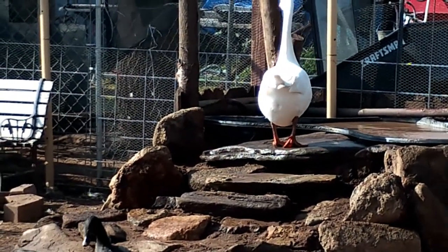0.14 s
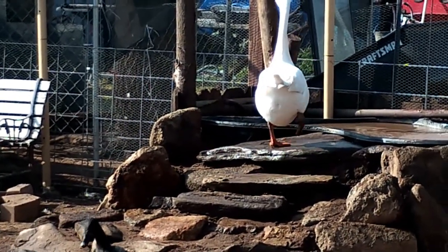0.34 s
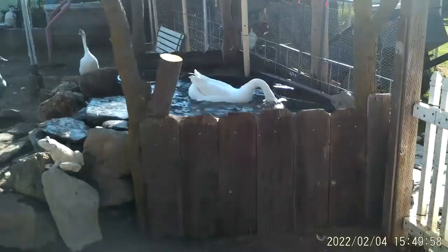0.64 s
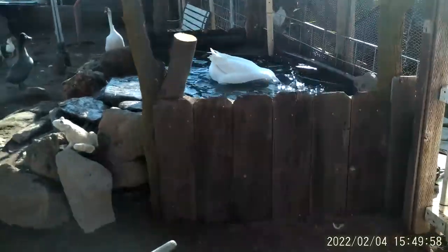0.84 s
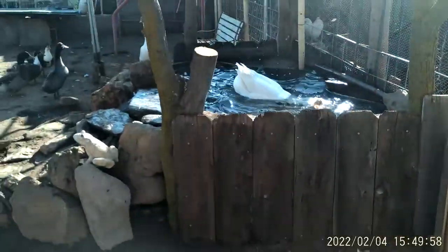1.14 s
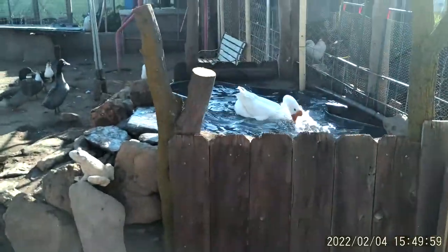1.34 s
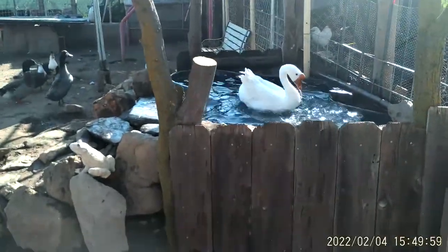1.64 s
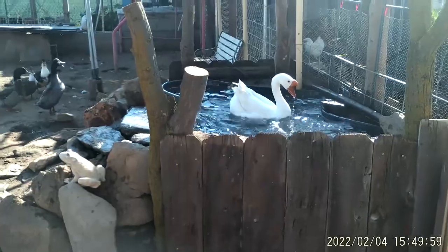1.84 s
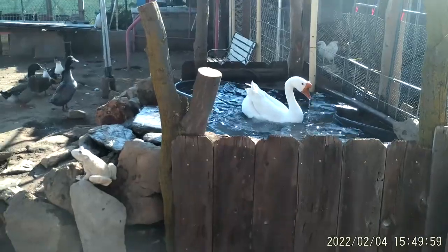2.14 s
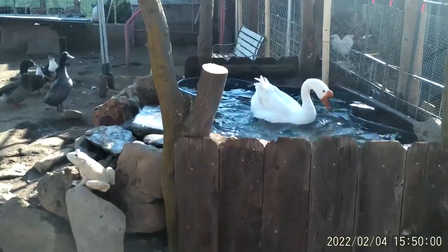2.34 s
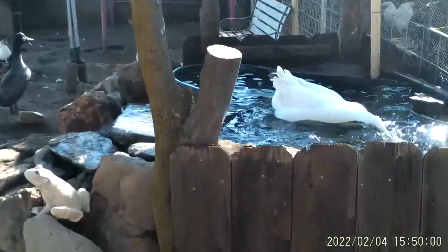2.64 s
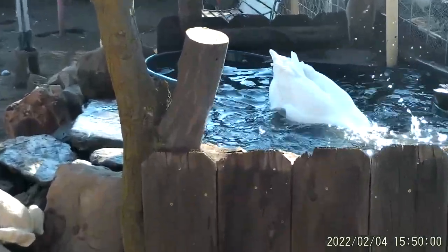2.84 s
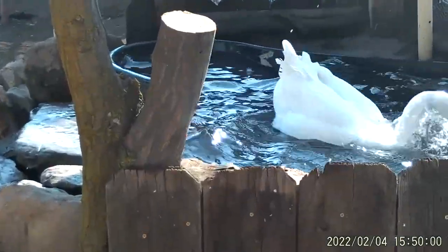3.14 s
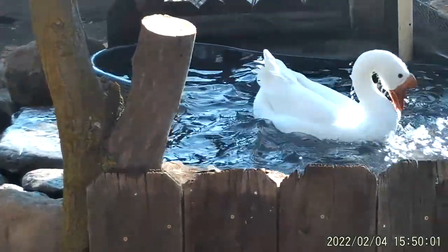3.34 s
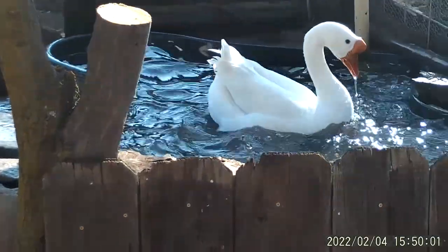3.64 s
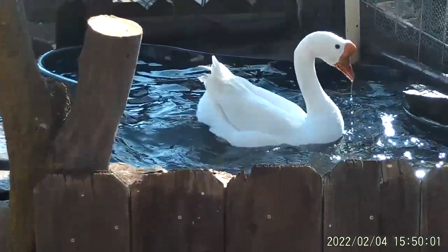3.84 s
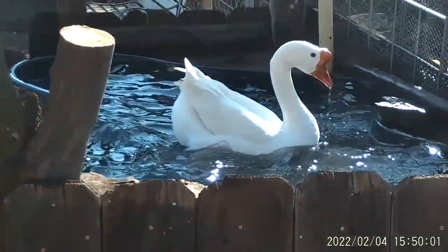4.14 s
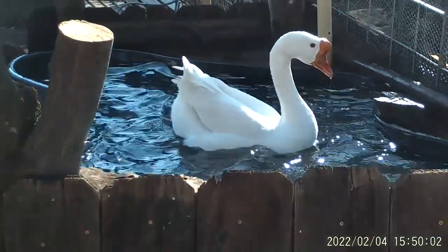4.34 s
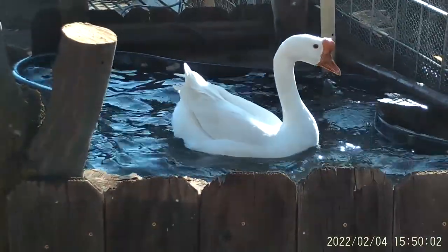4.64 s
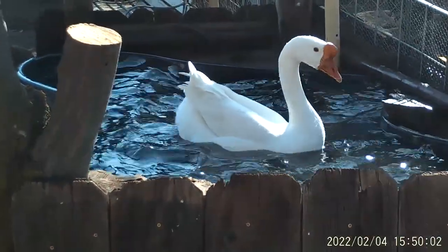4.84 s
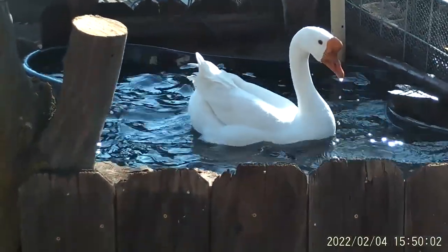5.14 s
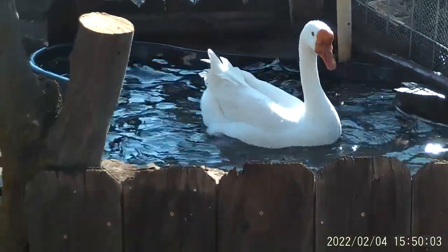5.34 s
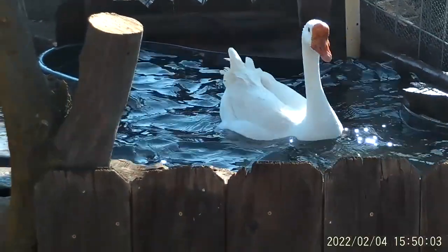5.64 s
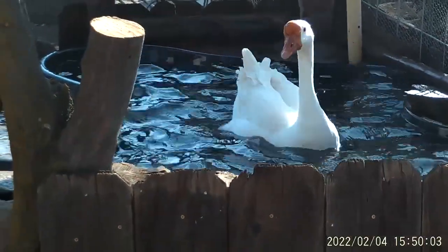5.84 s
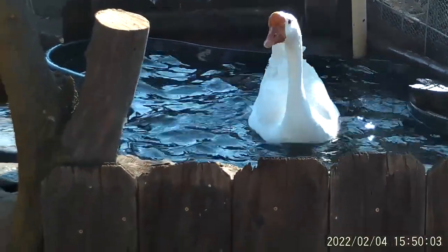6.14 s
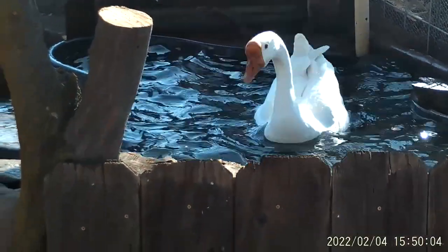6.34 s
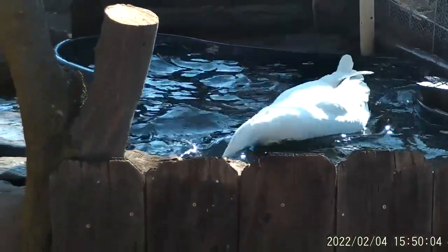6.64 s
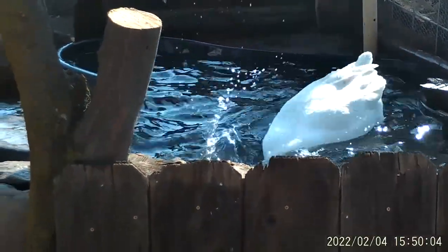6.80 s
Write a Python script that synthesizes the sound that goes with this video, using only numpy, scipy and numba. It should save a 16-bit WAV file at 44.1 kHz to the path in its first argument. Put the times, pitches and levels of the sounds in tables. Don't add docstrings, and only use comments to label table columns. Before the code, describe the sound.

Harsh goose honks echo lightly around a yard, with bathing splashes, plank knocks and two clear bird yelps over a faint pump hum.

```python
import sys
import numpy as np
from scipy import signal
from scipy.io import wavfile
from scipy.ndimage import uniform_filter1d
from numba import njit

SR = 44100
rng = np.random.default_rng(int(sys.argv[2]) if len(sys.argv) > 2 else 0)


def materialize(psi):
    bounded = np.clip(np.atleast_2d(psi).T, -1, 1)
    quanta = np.round(bounded * 32767).astype(np.int16)
    wavfile.write(sys.argv[1], SR, quanta)


def how_loud(loudness_db):
    steps = np.asarray(loudness_db, float) / 20
    return 10 ** steps


N = 307377


def rms_one(x):
    return x / np.sqrt(np.mean(x ** 2) + 1e-20)


def in_time(rows):
    s, *columns = np.transpose(rows)
    return [np.interp(np.arange(N) / SR, s, c) for c in columns]


def drift(rate):
    knots = rng.standard_normal(int(N / SR * 400) + 2)
    return np.interp(np.arange(N) / SR * rate, np.arange(len(knots)), knots) * 1.22


def band(x, low_hz, high_hz, order=2):
    sos = signal.butter(order, [low_hz, min(high_hz, .45 * SR)], "band", fs=SR, output="sos")
    return signal.sosfilt(sos, x)


@njit
def resonate(x, hz, r, step):
    y = np.zeros(len(x))
    for i in range(2, len(x)):
        drive = (1 - r * r) / 2 * (x[i] - x[i - 2])
        y[i] = drive + 2 * r * np.cos(step * hz[i]) * y[i - 1] - r * r * y[i - 2]
    return y


def mode(x, hz, width_hz):
    return resonate(x, hz + np.zeros(len(x)), np.exp(-np.pi * width_hz / SR), 2 * np.pi / SR)


def even(x):
    power = uniform_filter1d(uniform_filter1d(x ** 2, size=2000), size=2000)
    return x / np.sqrt(power + 1e-12)


def held(start, length, rise_db_s, fall_db_s):
    t = np.arange(0, N / SR, .001)[:, None]
    return -rise_db_s * np.maximum(start - t, 0) - fall_db_s * np.maximum(t - start - length, 0)


def summed(db, calm_db):
    total = 10 * np.log10(np.sum(how_loud(2 * db), axis=1) + how_loud(2 * calm_db))
    return np.interp(np.arange(N) / SR * 1000, np.arange(len(total)), total)


# [f/Hz, level/dB per Hz]
MURMUR_COLOUR = [(18, -39), (30, -9), (87, -11), (175, -10.5), (294, -4), (1130, 2), (1320, 2.5),
                 (1580, -1.5), (2160, -10.5), (2800, -13.5), (3190, -11.5), (5640, -17.5), (6940, -26.5),
                 (9470, -27.5), (14700, -31)]
# [t/s, level/dB]
MURMUR_LEVEL = [(0.0, -59.5), (0.55, -60), (0.83, -55.5), (1.18, -60), (2.02, -57), (2.91, -62),
                (3.22, -55), (4.06, -64), (5.18, -60.5), (5.63, -62), (6.97, -60)]
# [f/Hz, width/Hz, level/dB]
PUMP = [
    (233.2, 20.3, -5.5),
    (450.4, 42, -1.5),
]


def yard(patchy_db=3.0):
    white, out = rng.standard_normal((2, N)), 0
    edges_hz = 100 * 2 ** np.arange(0, 7.4, 1 / 3)
    colour_hz, colour_db = np.transpose(MURMUR_COLOUR)
    murmur_db, = in_time(MURMUR_LEVEL)
    pump_db, pump_starts_s, pump_rise_db_s = -66, 0.69, 56
    hum_db = pump_db - pump_rise_db_s * np.maximum(pump_starts_s - np.arange(N) / SR, 0)
    for k, (low, high) in enumerate(zip(edges_hz, edges_hz[1:])):
        level_db = np.interp(np.log(low * high) / 2, np.log(colour_hz), colour_db)
        flicker_db = patchy_db * np.clip(2000 / low, .3, 1) * drift(9)
        out = out + how_loud(level_db + flicker_db) * band(white[k % 2], low, high)
    out = out / np.std(band(out, 520, 1000)) * how_loud(murmur_db)
    hum = sum(how_loud(hum_db + db) * even(mode(mode(white[0], hz, w), hz, w)) for hz, w, db in PUMP)
    hiss = how_loud(-74.5) * rms_one(band(white[1], 8100, 14200))
    return out + hum + hiss


# [t/s, length/s, level/dB]
SPRAYS = [
    (0.0, 0.52, -64),
    (0.613, 0.071, -61),
    (1.317, 0.36, -56),
    (1.867, 0.22, -61),
    (2.626, 0.27, -63),
    (3.134, 0.2, -56.5),
    (5.422, 0.1, -65),
    (6.714, 0.057, -55),
    (6.85, 0.11, -64.5),
]
# [t/s, length/s, level/dB]
GUSTS = [(0.0, 0.1, -67), (0.601, 0.536, -71), (1.33, 0.038, -74), (1.465, 0.016, -56), (1.822, 0.088, -60),
         (2.56, 0.028, -65), (2.829, 0.056, -65), (2.976, 0.0414, -70), (3.33, 0.029, -70.5),
         (3.467, 0.024, -59), (4.44, 0.051, -69), (5.201, 0.14, -75), (5.42, 0.083, -65.5),
         (5.555, 0.15, -75)]


def water_and_wind():
    s, length, db = np.transpose(SPRAYS)
    spray_db = summed(db + held(s, length, rise_db_s=253, fall_db_s=126), calm_db=-70.5)
    s, length, db = np.transpose(GUSTS)
    wind_db = summed(db + held(s, length, rise_db_s=304, fall_db_s=198), calm_db=-78.5)
    drops = rng.random(N) < 1500 * how_loud(5 * drift(25)) / SR
    drop_size = how_loud(2.5 * np.minimum(rng.exponential(1, N), 7))
    grains = drops * drop_size * rng.choice([-1, 1], N)
    spray = rms_one(band(grains, 2230, 8700)) * how_loud(spray_db - 6.5)
    rumble = band(rng.standard_normal(N), 25, 153.0) * how_loud(2.4 * drift(34))
    return spray + rms_one(rumble) * how_loud(wind_db + 1.0)


# [t/s, peak level/dB, f/Hz]
DRIPS = [(0.655, -45, 3720), (0.668, -51, 2280), (1.3865, -49, 3480), (1.404, -46, 3900),
         (1.769, -47, 2000), (2.5533, -48, 5494), (2.9963, -51, 4067), (3.2629, -45.5, 3500),
         (3.349, -49, 5860), (1.285, -52, 5870), (1.321, -44.5, 3900), (1.3595, -41.5, 2303),
         (1.3795, -46, 2460), (1.421, -46, 3640), (1.4441, -60, 2370), (1.5175, -41, 5445),
         (1.5617, -46, 5454), (1.6265, -44, 5520), (1.6584, -46.5, 3970), (1.779, -62, 2468),
         (2.452, -47.5, 3900), (2.5152, -38.5, 4100), (2.6658, -46.5, 2970), (2.8691, -43.5, 2360),
         (2.97, -42.5, 5850), (3.1589, -44, 2438), (3.2529, -51, 5600), (3.319, -42.5, 7350),
         (3.38, -41.5, 3850), (3.8542, -52, 5659), (6.7095, -42, 3748), (6.7392, -54, 5415),
         (6.867, -50, 3890)]
# [t/s, peak level/dB, f/Hz]
GURGLES = [(0.64, -52, 965), (0.714, -44.5, 893), (1.241, -47.5, 740), (1.349, -43, 957), (1.383, -41, 712),
           (3.26, -37, 1082), (3.329, -59, 1115), (3.389, -43, 672), (6.72, -39.5, 875), (6.744, -41, 1115),
           (6.768, -49.5, 493.6)]


def drips():
    out, t = np.zeros(N + 4410), np.arange(4410) / SR
    for s, db, hz in DRIPS:
        burst = rng.standard_normal(len(t)) * how_loud(-60 * t / 0.05) * (1 - np.exp(-t / 0.00018))
        hiss = 0.83 * band(burst, 1010, 10500, order=4) + 5.6 * mode(burst, hz, 415)
        at = round(s * SR)
        out[at:at + len(t)] += how_loud(db - 6.5) * hiss
    for s, db, hz in GURGLES:
        rising = np.sin(2 * np.pi * hz * t * (1 + 3.4 * t))
        pocket = rising * how_loud(-60 * t / 0.076) * (1 - np.exp(-t / 0.0032))
        wobble = 1 + 1.2 * band(rng.standard_normal(len(t)), 30, 400) * 7
        at = round(s * SR)
        out[at:at + len(t)] += how_loud(db) * pocket * wobble
    return out[:N]


# [t/s, peak level/dB, f/Hz, crack level/dB, thump level/dB]
KNOCKS = [(1.101, -54, 288.3, -66, -71.5), (1.434, -37, 320, -59, -63), (1.473, -46, 325, -64, -39),
          (1.788, -46, 305, -69, -64.5), (1.834, -37, 301, -73, -67.5), (1.881, -33, 356, -57, -57),
          (2.31, -32, 376, -37.5, -68), (2.531, -30, 376, -35, -63), (2.781, -50, 320.3, -50, -63),
          (2.996, -38, 380, -40, -62), (3.454, -35, 341, -23.5, -71)]


def knocks():
    out, t = np.zeros(N + 8820), np.arange(8820) / SR
    cycles_to_die = 41
    for s, db, hz, crack_db, thump_db in KNOCKS:
        body = np.sin(2 * np.pi * hz * t) * how_loud(-60 * t * hz / cycles_to_die)
        body = body + how_loud(-10.0) * np.sin(2 * np.pi * 1.9 * hz * t) * how_loud(-60 * t / 0.059)
        snap = rng.standard_normal(len(t)) * how_loud(-60 * t / 0.014) * (1 - np.exp(-t / 0.0006))
        crack = band(snap, 570, 6500, order=6)
        crack = 0.77 * crack + 0.72 * mode(crack, 3550, 710) - 1.4 * mode(crack, 6300, 900)
        thump = np.sin(2 * np.pi * 70 * t) * how_loud(-60 * t / 0.065)
        knock = how_loud(db) * body * (1 - np.exp(-t / 0.0011))
        at = round(s * SR)
        out[at:at + len(t)] += knock + how_loud(crack_db + 11.5) * crack + how_loud(thump_db) * thump
    return out[:N]


# [t/s, f/Hz, level/dB]
SPARROW = [
    (.103, 5280, -84),
    (.11, 5600, -54),
    (.122, 5400, -52),
    (.147, 4330, -59),
    (.157, 3900, -79),
    (.174, 5300, -54),
    (.183, 5850, -47),
    (.2, 5600, -95),
]


def sparrow():
    hz, db = in_time(SPARROW)
    t = np.arange(N) / SR
    tremble_db = 4 * drift(300) + 6.0 * np.cos(2 * np.pi * 90.0 * t)
    return how_loud(db - 9 + tremble_db) * (t < .2) * np.sin(2 * np.pi * np.cumsum(hz) / SR)


# [f/Hz, level/dB]
YELP_THROAT = [(800, 4.5), (1450, 5), (1600, 10), (1730, 6), (1900, -3), (2400, -9), (3800, -14),
               (6500, -33), (11000, -42)]


def yelp(rows, throb_db=0, strain=1, fourth_db=0, top_db=0):
    s, hz, db, first_db, open_db = np.transpose(rows)
    span = np.arange(round(s[0] * SR), round(s[-1] * SR))
    t = span / SR
    shake = band(rng.standard_normal((8, len(t))), 90, 380) * 8
    gate = np.clip(np.minimum(t - s[0], s[-1] - t) / .004, 0, 1)
    glide = uniform_filter1d(np.interp(t, s, hz), size=400, mode="nearest")
    phase = 2 * np.pi * np.cumsum(glide * (1 + .007 * strain * shake[7])) / SR
    throb_hz, throb_top_s = 55, 3.111
    throb = np.clip((t - throb_top_s) / 0.0067 + 1, 0, 1) * np.cos(2 * np.pi * throb_hz * (t - throb_top_s))
    level_db = np.interp(t, s, db) + throb_db * throb
    throat_hz, throat_db = np.transpose(YELP_THROAT)
    out = np.zeros(N)
    for k in range(13):
        hoarse = 1 + (.24 + .1 * min(k, 6) * strain ** 2) * shake[k % 7]
        colour_db = np.interp(np.log((k + 1) * glide), np.log(throat_hz), throat_db)
        bill_db = np.interp(t, s, [first_db, 0 * s, open_db][min(k, 2)])
        extra_db = (k == 3) * fourth_db + max(k - 3, 0) * top_db
        loud = np.sqrt(2) * gate * how_loud(level_db + colour_db + bill_db + extra_db)
        out[span] += loud * hoarse * np.sin((k + 1) * phase)
    return band(out, 480, 12000, order=3)


# [t/s, f/Hz, level/dB, first partial/dB, bill opening/dB] a
GURGLE_LOW = [
    (1.272, 775, -64, 11, -13),
    (1.285, 728, -69, 8.4, -10),
    (1.298, 638, -52, 8.8, -13),
    (1.312, 625, -79, 7.1, -10),
]
YELP_SHORT = [
    (3.08, 747, -74, 5, -16),
    (3.089, 785, -42, -7, -26),
    (3.101, 773, -51, -4, -26),
    (3.111, 815, -34, -10, -22),
    (3.12, 770, -36.5, -5, 5),
    (3.13, 765.5, -39.5, 3, 4.5),
    (3.147, 743, -36, -6, -2),
    (3.157, 677, -42, 10.5, -22),
    (3.166, 640, -59, 5, -8),
]
YELP_TAIL = [
    (3.162, 635, -61, -2, -6),
    (3.175, 607, -54.5, -5, -8),
    (3.19, 671, -57, 4, -18),
    (3.21, 693, -64, 0, -10),
    (3.24, 685, -60, 2, -12),
]
YELP_RISE = [
    (4.895, 693, -60.5, -1, 1),
    (4.915, 670, -56.5, 3.5, -15),
    (4.935, 731, -42.5, -0.5, -15),
    (4.95, 779.5, -50.5, -3, -1),
    (4.965, 824.5, -47, -4, 6.5),
    (4.98, 849.5, -39.5, 3.5, -10),
    (4.993, 933.5, -43, -4, -15),
]
YELP_BREAK = [
    (4.99, 1035, -40, 0, 4),
    (5.003, 1030, -32, -6, -7),
    (5.015, 1058, -38, 2.5, -3),
    (5.032, 1065, -49, 0, -5.5),
]
YELP_SPLIT = [
    (5.005, 659.5, -55, -22, -12),
    (5.02, 666, -41, -23, 0),
    (5.03, 660, -41, -24, -13),
    (5.039, 680, -45, -18, -10),
]
YELP_HOLD = [
    (5.016, 874, -39, -1, 5),
    (5.027, 849, -35, -4.5, -4),
    (5.045, 856, -40, -6.5, 5),
    (5.065, 861, -35.5, -7, -2),
    (5.08, 843, -39.5, -7, 5.5),
    (5.09, 837, -54, 6.5, 15),
    (5.105, 829, -65, 2, 5.5),
]


def yelps():
    second = yelp(YELP_RISE, top_db=-1.0) + yelp(YELP_BREAK) + yelp(YELP_SPLIT) + yelp(YELP_HOLD)
    first = yelp(YELP_SHORT, throb_db=4.0, strain=0.55, fourth_db=-8, top_db=-1.5)
    return yelp(GURGLE_LOW) + first + yelp(YELP_TAIL, strain=3.6) + second


# [t/s, peak level/dB, f/Hz]
SLAPS = [(0.6452, -48, 1350), (0.6677, -34, 1410), (0.76, -25.5, 1344), (0.765, -25, 1274),
         (0.8439, -31.5, 1349), (0.9241, -40, 2050), (0.9727, -41, 1310), (0.991, -36, 1360),
         (1.0149, -33, 1394), (1.0284, -27.5, 2060), (1.0792, -35, 1429), (1.124, -38, 1950),
         (1.146, -41, 1370), (1.1815, -42, 1883), (1.204, -40, 1260), (1.2144, -41, 1246),
         (1.3017, -39, 1355), (1.404, -34, 1220), (1.414, -35, 1274), (1.474, -35, 1345),
         (1.621, -41, 1270), (1.6564, -36.5, 1260), (1.6916, -38, 1276), (1.7477, -49, 1383),
         (1.783, -41, 1403), (1.8475, -37, 1406), (1.9135, -43, 1104), (1.914, -34, 1360),
         (2.0081, -38, 1290), (2.0178, -39, 1240), (2.044, -30, 1490), (2.2052, -41, 1530),
         (2.5887, -39, 1355),
    (2.664, -40, 1430),
    (2.7146, -36, 1500),
    (2.7768, -32, 1246),
    (2.8052, -29, 1280),
    (2.8468, -26.5, 1430),
    (2.8731, -34, 1390),
    (2.9006, -30, 1486),
    (2.9463, -29.5, 1426),
         (3.4855, -31, 1498), (3.5208, -34, 1410), (3.5317, -34, 1400), (3.5545, -29.5, 1430),
                (3.6065, -35, 1414), (3.636, -30.5, 1540), (3.7164, -31.5, 1400), (4.074, -44, 1420),
                (4.1099, -39, 1468), (4.1415, -40, 1324), (4.1726, -34, 1293), (4.186, -28, 1410),
                (4.223, -29.5, 1434), (4.3003, -29, 1550), (4.3309, -27.5, 1550), (4.433, -34, 1430),
         (5.4166, -33, 1290), (5.4631, -36.5, 1452), (5.4931, -33.5, 1235), (5.5333, -38, 1519),
              (5.5463, -34, 1456), (5.5606, -29, 1453), (5.6008, -30, 1467), (5.6375, -30, 1435),
              (5.6906, -34.5, 1350), (5.7178, -30, 1380), (5.7749, -32.5, 1580), (5.8073, -31, 1345),
              (5.8787, -33, 2103), (6.4469, -39, 1360), (6.461, -32.5, 1320), (6.472, -34.5, 1380),
              (6.5656, -36, 1600), (6.5962, -36, 1339), (6.6275, -32, 1580), (6.684, -31.5, 1330),
              (6.9226, -41, 1483), (6.9399, -37, 1273)]


def hard_slaps():
    out, t = np.zeros(N + 1323), np.arange(1323) / SR
    rise_s, trim_db = .0022, -5.5
    shape = t / rise_s * np.exp(1 - t / rise_s)
    for s, db, hz in SLAPS:
        top = how_loud(-18) * band(rng.standard_normal(len(t)), 1380, 5760)
        at = round(s * SR)
        out[at:at + len(t)] += how_loud(db + trim_db) * shape * (np.sin(2 * np.pi * hz * t) + top)
    return out[:N]


# [t/s, length/s, f/Hz, level/dB]
SINGS = [(0.753, 0.051, 3840, -62), (3.7, 0.027, 5060, -71), (4.257, 0.12, 3530, -58.5),
         (4.323, 0.088, 5360, -63), (4.4, 0.048, 3776, -55), (5.803, 0.089, 2685, -51),
         (5.894, 0.032, 3860, -48), (1.63, 0.027, 3880, -60), (1.92, 0.039, 3720, -59),
         (5.03, .04, 5160, -54), (5.084, 0.06, 3900, -60), (5.03, .06, 4280, -55), (5.43, .14, 2050, -57),
         (6.67, .06, 3800, -58), (6.48, .2, 2900, -62), (6.5, .14, 3500, -64), (3.54, .17, 3500, -61),
         (3.56, .17, 2950, -60), (2.72, .2, 2550, -62), (4.4, .1, 2950, -60), (3.79, .25, 1300, -62),
         (5.11, 0.027, 5200, -62), (5.914, 0.022, 4794, -56.5), (3.148, 0.017, 3410, -56),
         (3.16, 0.013, 2420, -55)]


def sung(airy):
    out, width_hz, fade_db_s = 0, 100, 800
    for s, length, hz, db in SINGS:
        level_db = summed(db + held(np.array([s]), np.array([length]), fade_db_s, fade_db_s), -120)
        out = out + how_loud(level_db) * even(mode(mode(airy, hz, width_hz), hz, 2 * width_hz))
    return out


# [t/s, length/s, level/dB, swell/s, bill opening/dB]
HONKS = [(.93, 0.068, -48, 0.12, 2), (1.7, 0.3, -51, 0.049, -2), (2.658, 0.3, -41.5, 0.23, -13),
         (3.27, 0.18, -53, 0.13, -8), (3.425, 0.3, -44, 0.073, 0), (4.112, 0.31, -39, 0.091, -5.5),
         (4.433, 0.098, -47.5, 0.02, -6), (4.871, 0.28, -42, 0.14, -3), (5.419, .25, -40.5, 0.14, -9),
         (5.675, .275, -44, 0.034, -2.5), (6.081, 0.12, -64, 0.021, 0.5), (6.201, 0.28, -57, 0.061, 0.5),
         (6.439, 0.27, -44.5, 0.022, -1.5), (6.895, 0.31, -45.5, 0.1, -7)]
# [t/s, length/s, level/dB, second resonance/dB, windpipe/dB]
CACKLES = [(.03, 0.15, -62.5, -14, -6), (.3, 0.1, -58, -12, -9), (0.494, 0.078, -56, -11, -10),
           (.64, 0.05, -48, -2, -9), (.756, 0.044, -35.5, -51, -22), (.82, 0.053, -45, -9, -17),
           (1.001, 0.082, -41, -1.5, -10), (1.111, 0.071, -51, 1, -4), (1.205, 0.049, -47, -9, -15),
           (1.302, 0.028, -44, -20, -16.5), (1.41, 0.045, -47, -6.5, -13), (1.625, 0.031, -52, -1, -3),
           (1.655, 0.033, -46, -2.5, -11), (2.019, 0.055, -44, -9, -16), (2.2, 0.039, -53, -10, -14),
           (2.43, 0.068, -51, -10.5, -11), (2.576, 0.0383, -54, -14, -20), (2.63, 0.24, -56, 4, -5),
           (4.073, 0.037, -53.5, -33, -15), (4.567, 0.053, -53, -10, -8), (4.99, 0.036, -48.5, -2, 3),
           (1.47, 0.034, -49, -10, -15), (1.78, 0.036, -53, -3, -8), (1.9, 0.032, -51, 0.5, -5.5)]


def calls():
    s, length, db, swell, bill_db = np.transpose(HONKS)
    swell_db, sag_db_s, onset_db_s = 7.5, 18, 897.5
    bill_lags_s, bill_opens_s, bill_shut_db = .025, .04, 16
    age = np.clip(np.arange(0, N / SR, .001)[:, None] - s, 0, length)
    to_end = length - age
    gate = db + held(s, length - bill_lags_s, onset_db_s, fall_db_s=200)
    effort = gate - swell_db * np.maximum(1 - age / swell, 0) - sag_db_s * np.maximum(age - swell, 0)
    bill = db + held(s, length, onset_db_s, fall_db_s=450) + bill_db
    bill = bill - bill_shut_db * np.maximum(1 - age / (swell + bill_opens_s), 0)
    at, short, peak_db, second_db, pipe_db = np.transpose(CACKLES)
    cackle = peak_db + held(at, short, rise_db_s=2000, fall_db_s=300)
    effort_db = summed(np.hstack([effort, cackle]), -75)
    neck_lift_hz, neck_stretch_s = 117, 0.096
    tight_db = summed(effort + 10 * np.log10(np.clip(age / neck_stretch_s, .01, 1)), -120)
    lift_hz = neck_lift_hz * how_loud(2 * (tight_db - effort_db))
    second_db = summed(np.hstack([bill - 5 * to_end, cackle + second_db]), -107)
    pipe_db = summed(np.hstack([bill - 35 * to_end, cackle + pipe_db]), -85)
    hurry = 10.5 * np.maximum(summed(cackle, -86.5) + 45, 0)
    return effort_db, lift_hz, second_db, pipe_db, hurry


# [f/Hz, width/Hz, level/dB]
PIPE = [(2680, 110, 3), (3050, 100, 1), (3520, 120, 0), (3850, 130, 1), (4250, 150, 0), (4800, 150, 0),
        (5150, 130, 1), (5500, 200, 0), (5950, 250, -6)]


def rasp(jitter=.09, uneven_db=1.3):
    effort_db, lift_hz, second_db, pipe_db, hurry = calls()
    open_range_db = 18
    opening = uniform_filter1d(np.clip(1.5 + (pipe_db - effort_db) / open_range_db, 0, 1), size=3000)
    per_s = 70 + (110 - 70) * opening
    main_hz = 1224 + (1409 - 1224) * opening + uniform_filter1d(lift_hz, size=3000)
    second_hz = 1907 + (2084 - 1907) * opening
    turns = np.cumsum((per_s + hurry) * np.exp(jitter * drift(90))) / SR
    slaps = np.diff(np.floor(turns), prepend=0) * how_loud(uneven_db * np.clip(drift(150), -2, 1.5))
    lag = np.exp(-1 / (.0016 * SR))
    flow = rms_one(signal.lfilter([1], [1, -2 * lag, lag ** 2], slaps)) + .12
    puff = rms_one(flow * rng.standard_normal(N))
    source = rms_one(slaps) * .55 + puff * .55
    throat = mode(mode(mode(source, main_hz, 260), main_hz, 300), main_hz, 500)
    fixed_ring = mode(mode(mode(source, 1270, 150), 1230, 250), 1230, 280)
    main = rms_one(throat) - how_loud(-6.5) * rms_one(fixed_ring)
    main = main + how_loud(-18.5) * rms_one(band(source, 2300, 3120))
    second = mode(mode(source, second_hz, 210), second_hz, 300) + how_loud(-6.0) * band(source, 1820, 2560)
    airy = rms_one(slaps) * .45 + puff
    slide = second_hz / 2100
    pipe = 0
    for k, (hz, width_hz, db) in enumerate(PIPE):
        centre_hz = hz * slide * (1 + 0.01 * drift(6))
        pipe = pipe + (-1) ** k * how_loud(db + 1.0 * drift(10)) * mode(airy, centre_hz, width_hz)
    pipe = band(pipe + how_loud(-13) * airy, 2300, 6300, order=6)
    voice = how_loud(effort_db - 1.0) * even(main) + how_loud(second_db - 3.0) * even(second)
    return voice + how_loud(pipe_db - 3.5) * even(pipe) + sung(airy)


def fences(x):
    t60_s = .3
    t = np.arange(round(t60_s * SR)) / SR
    tail = rng.standard_normal(len(t)) * how_loud(-60 * t / t60_s) * np.clip(t / .012 - .5, 0, 1)
    tail = tail - (1 - how_loud(-60 * t / .3)) * band(tail, 2600, 12000, order=1)
    tail = tail / np.sqrt(np.sum(tail ** 2))
    return band(signal.fftconvolve(x, tail)[:N], 300, 6500, order=1)


def scene():
    near = knocks() + yelps()
    far = sparrow() + hard_slaps() + rasp()
    echoes = fences(how_loud(-15) * near + how_loud(-7.5) * far)
    return (yard() + water_and_wind() + drips() + near + far + echoes)[None]


def starved(x, size):
    from_hz, from_db, per_db, hole_chance = 6400, -62, .08, .4
    hz, _, lines = signal.stft(x, SR, "cosine", size, size // 2)
    height, wide = np.abs(lines), size // 128
    loud_db = 10 * np.log10(np.sum(height ** 2, axis=0) + 1e-12)
    need = np.clip(per_db * (loud_db - from_db), 0, 1.3)
    strips = np.repeat(rng.random((len(hz) // wide + 1, len(need))), wide, axis=0)[:len(hz)]
    strong = height > need * uniform_filter1d(height, size=25, axis=0)
    kept = strong * (strips > hole_chance * (need - .7)) * (1 + .3 * need ** 2)
    lines = lines * np.where(hz[:, None] > from_hz, kept, 1)
    return signal.istft(lines, SR, "cosine", size, size // 2)[1][:N]


# [from t/s, to t/s]
SHARP_STRETCHES = [(.63, .82), (1.01, 1.05), (1.27, 1.79), (2.29, 2.34), (2.44, 2.56), (2.95, 3.48),
                   (4.05, 4.15), (4.88, 5.11), (6.69, 6.76)]
# [t/s, length/s]
DROPOUTS = [(.762, .024), (1.495, .022), (2.3, .024), (2.492, .05), (3.07, .046), (3.45, .028)]


def thinned_treble(dry):
    t = np.arange(N) / SR
    sharp = uniform_filter1d(sum((t > a) * (t < b) * 1. for a, b in SHARP_STRETCHES), size=500)
    thin = (sharp * starved(dry[0], size=512) + (1 - sharp) * starved(dry[0], size=2048))[None]
    lost = uniform_filter1d(sum((t > s) * (t < s + length) * 1. for s, length in DROPOUTS), size=150)
    dull = signal.sosfiltfilt(signal.cheby2(8, 40, 9400, fs=SR, output="sos"), thin)
    top_cut = signal.ellip(10, .5, 60, 14750, fs=SR, output="sos")
    return signal.sosfilt(top_cut, thin + lost * (dull - thin))


def low_pass(x):
    return signal.sosfilt(signal.butter(12, 14720, fs=SR, output="sos"), x)


def record(dry):
    mix = thinned_treble(dry)
    return low_pass(mix)


dry = scene()
out = record(dry)
materialize(out)
```